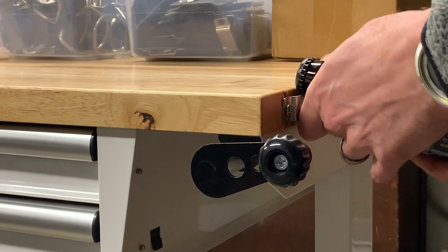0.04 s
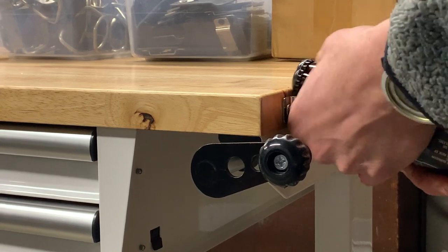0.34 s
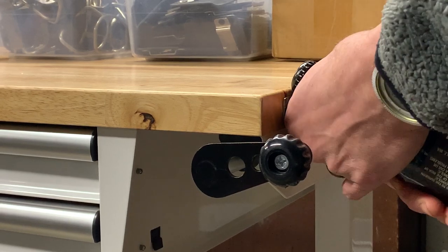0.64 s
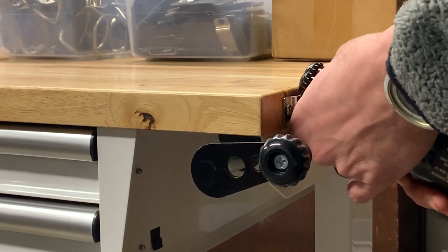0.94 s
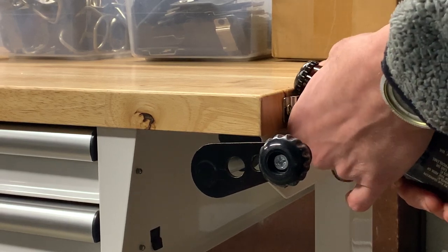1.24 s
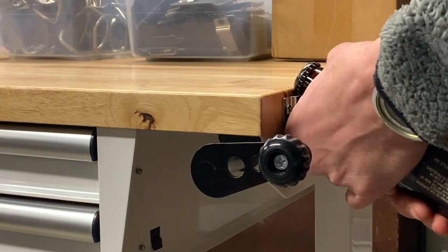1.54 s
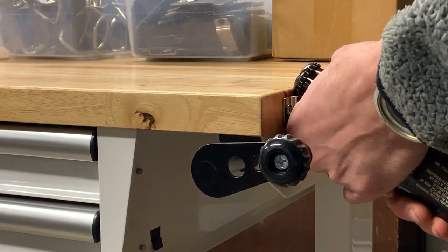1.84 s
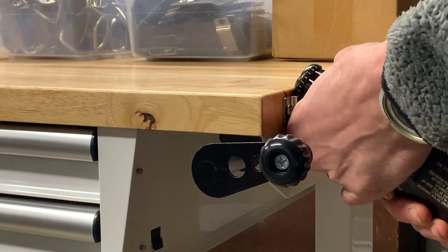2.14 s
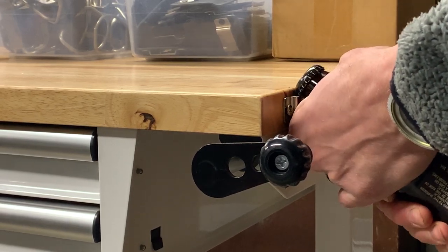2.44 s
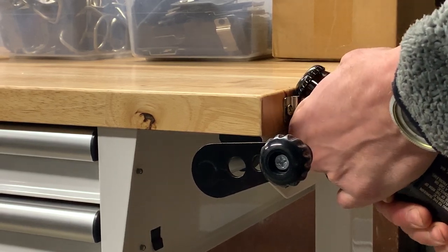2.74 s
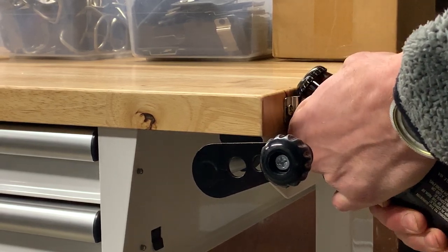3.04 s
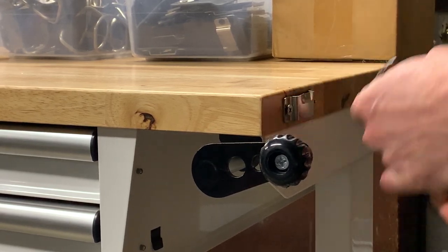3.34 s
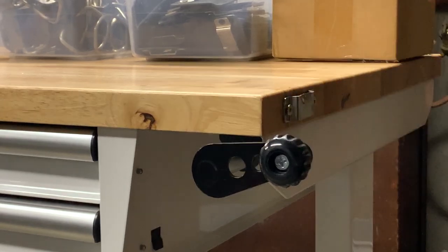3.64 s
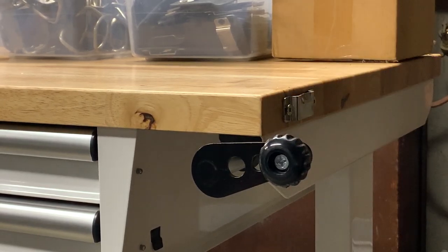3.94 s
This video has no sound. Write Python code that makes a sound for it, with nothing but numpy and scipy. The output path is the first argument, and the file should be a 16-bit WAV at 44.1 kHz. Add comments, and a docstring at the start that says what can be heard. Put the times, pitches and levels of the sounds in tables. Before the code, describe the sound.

A bottle is opened on a metal opener fixed to a wooden workbench. Soft knocks and creaks lead to a spit of gas and a hollow pop, then the cap lands ringing. Heard close in a small workshop.

```python
"""A capped bottle is levered open on a metal opener at the edge of a wooden workbench.
Heard from close by on a stereo pair of microphones, in a small workshop with a low rumble.
Glass and cap knock, creak and rub on the opener; the cap gives way with a spit of gas and a hollow pop
that shakes the bench. The opener rattles faintly, and the cap lands with a bright ring."""
import sys
import numpy as np
from scipy import signal
from scipy.fft import rfft, irfft
from scipy.io import wavfile
from scipy.ndimage import uniform_filter1d

SR = 44100
rng = np.random.default_rng(int(sys.argv[2]) if len(sys.argv) > 2 else 0)


def unload_audio(sound):
    """Save the sound as a 16-bit wav file, at the path given as the first command line argument."""
    columns = np.transpose(np.atleast_2d(sound))
    # keep every value between -1 and 1, then stretch to whole-number steps
    steps = np.round(np.clip(columns, -1, 1) * 32767)
    wavfile.write(sys.argv[1], SR, steps.astype(np.int16))


N = 176400

# the workshop's rumble: (frequency [Hz], level [dB])
RUMBLE_SPECTRUM = [(20, -1), (35, -3), (65, -0.5), (105, -3.5), (160, -16), (300, -17.5), (600, -29),
                   (1200, -41), (2500, -44.5), (7000, -48.5), (10000, -46.5), (11500, -49), (14000, -46.5),
                   (16000, -59)]
# its slow swell: (time [s], level [dB])
RUMBLE_LEVEL = [(0, -68), (.3, -64.5), (.6, -59), (1.5, -56.5), (2.55, -54), (2.8, -57.5), (3.2, -60),
                (4, -55)]
# the room's reverberation: (frequency [Hz], t60 [s])
ROOM_T60 = [(100, 0.38), (300, 0.54), (700, 0.44), (2000, 0.41), (5000, 0.34), (9000, .27), (15000, .22)]
# how alike the room is at the two microphones: (frequency [Hz], coherence [0-1])
MIC_COHERENCE = [(50, 0.96), (130, .88), (300, 0.52), (700, 0.12), (1500, 0.034), (5000, 0.035)]

# friction: (time [s], length [s], level [dB], roughness [0-1])
GLASS_RUBS = [(.02, 0.34, -81, 0.54), (.235, 0.21, -65, 0.62), (.38, 0.086, -60.5, .7),
              (0.739, 0.12, -66, .8), (0.961, .06, -82, 0.6), (1.112, 0.07, -70, 0.4), (1.91, .15, -73, .6),
              (2.845, .13, -77, .6)]  # skin on glass
SLEEVE_RUSTLES = [(1.9, 0.29, -69, .7), (2.259, 0.25, -70, .8), (3.301, 0.34, -58, 0.6)]  # hand and sleeve strain, then draw the bottle away
# the cap's rim ticks on the steel: (time [s], level [dB])
RIM_TICKS = [(.122, -63), (.476, -60), (.883, -47.5), (1.2535, -51), (1.28, -58), (1.665, -59), (1.69, -55),
             (1.708, -60), (1.76, -60), (2.617, -64)]
# the bottle knocks on the opener: (time [s], wooden thud [dB], metal click [dB], thud rise [s])
BOTTLE_KNOCKS = [(.388, -43.5, -48, 0.0063), (.42, -44, -63, 0.016), (.4735, -32.5, -45.5, 0.0023),
                 (0.578, -64, -65, .002), (.746, -49.5, -48.5, .002), (.784, -40, -56, 0.01),
                 (.806, -40.5, -63, 0.0063), (.87, -44, -68, 0.012), (1.161, -56.5, -59.5, 0.002),
                 (1.257, -44, -62, 0.0057), (1.281, -36.5, -47, 0.0024), (1.305, -45, -66, 0.0097),
                 (1.81, -55.5, -85, .02), (1.85, -54.5, -89, 0.01), (1.975, -55, -74, 0.011),
                 (3.402, -47, -51, 0.0034)]
# the neck seats in the opener: (time [s], hollow knock [dB], metal click [dB])
NECK_SEATS = [(.678, -37.5, -50), (2.887, -40.5, -72)]
# the crimp creaks under the lever, in single slips: (time [s], level [dB])
CRIMP_SLIPS = [(1.94, -55), (2.024, -48), (2.12, -58), (2.22, -57), (2.30, -50), (2.35, -58), (2.385, -58),
               (2.436, -54), (2.536, -62), (2.615, -57)]
# the cap lands on its rim and slaps flat: (time [s], crack [dB], rim tick [dB])
CAP_IMPACTS = [(3.617, -7.5, -22), (3.6195, -7.5, -12.5), (3.6216, -15, -27), (3.6269, -21, -14)]

# noise colours of the sources: (frequency [Hz], level [dB])
RUB_SPECTRUM = [(300, -0.5), (1000, -7), (1900, -1.5), (3300, -8), (4500, 4), (5300, 4), (6300, -11),
                (10000, -13), (16000, -24)]  # skin on glass
TICK_SPECTRUM = [(1500, -24.5), (4500, -2), (7000, 0), (10000, -3), (12000, -1), (14500, -2), (17000, -19)]  # small steel contacts
THUD_SPECTRUM = [(60, -6), (150, -7.5), (300, 0), (400, -2), (570, 0.5), (800, -9), (1200, -18),
                 (2000, -22), (5000, -54)]  # wood
CLICK_SPECTRUM = [(400, -6), (1200, 2), (2500, -1.5), (3700, 1), (4550, 4), (5400, -6.5), (6500, -1.5),
                  (9500, -13), (15000, -27)]  # the metal opener
SEAT_SPECTRUM = [(120, -15), (400, -5), (600, -3.5), (780, 1), (1150, -7.5), (1500, -14.5), (2500, -19.5),
                 (4000, -28.5), (8000, -44.5)]  # the hollow bottle
SCRAPE_SPECTRUM = [(500, 4.5), (1500, -11), (2300, 6), (3000, -10), (4400, -13), (7000, -4), (12000, -26),
                   (14500, -14), (16000, -20)]  # crimp along steel
RUSTLE_SPECTRUM = [(120, -4.5), (350, 2), (700, -2), (1200, -9.5), (2500, -14.5), (5000, -25),
                   (12000, -32.5)]  # hand and sleeve
SLIP_SPECTRUM = [(120, -10), (350, 13), (650, 5.5), (1200, -8.5), (2500, -16.5), (5000, -45.5),
                 (15000, -39.5)]  # the creaking crimp
GAS_SPECTRUM = [(1000, -11), (2500, -15), (4800, -4), (6000, -8), (7200, -11), (8500, 0), (9800, -1.5),
                (11500, -14), (13200, -4), (15000, -5), (17000, -25)]  # escaping gas
POP_SPECTRUM = [(50, -12.5), (130, -14), (310, -1), (500, -6), (700, -1), (1100, -7.5), (1600, -8),
                (2700, -13.5), (4500, -22), (6500, -22.5), (12000, -46)]  # the opening neck
CRACK_SPECTRUM = [(60, -13), (150, -8), (330, 3.5), (550, -8), (800, -5), (1100, -10), (1800, -9),
                  (2400, -2), (3400, -4.5), (4400, 4), (5200, 2.5), (6500, -6.5), (8500, -7),
                  (11500, -35.5), (16000, -12.5)]  # the cap's impact
SHIMMER_SPECTRUM = [(700, -8), (1500, -9), (2400, -3.5), (3900, -6), (4400, 1), (5300, 8), (5800, -9),
                    (7200, -17), (8200, -3.5), (11000, -7.5), (14500, -3.5), (17000, -16)]  # the crimped rim's many weak modes

# resonances: (frequency [Hz], level [dB], t60 [s])
BENCH_MODES = [(230.1, -10, .3), (295.5, -8, 0.3), (481.4, -6, .22), (563.3, -4.5, .2), (623, -7, 0.11),
               (719.5, -17.5, .2)]
BOTTLE_MODES = [(204, -0.5, .42), (449, -10.5, 0.32), (576, -10.5, 0.14), (781, -1.5, .11),
                (955, -10.5, 0.055), (1174, -11, 0.092)]
POP_MODES = [(233.5, -13, 0.36), (298, -8.5, .33), (380.6, -11, 0.32), (611.6, 0, 0.36), (695, -5, 0.22),
             (746, 6.5, 0.043), (769, -2, 0.16), (1056, 2.5, 0.052), (1109, -17.5, .2), (1393, -9, .17),
             (1800, -10.5, .13), (2130, -20, .18), (2557, -25, .2)]  # bench and bottle together
CAP_MODES = [(328.7, -3, .08), (2460, -10.5, .13), (3180, -11, 0.16), (3650, -20, .2), (4350, 2, .04),
             (4920, -8, .18), (5100, -8, .15), (5170, -1, 0.11), (5270, -16.5, .4), (5290, -8, .27),
             (5400, -12.5, .28), (6358, -18, .2), (8070, -16, .27), (14500, -1, .04)]

CRIMP_S, GAS_S, POP_S, RATTLE_S, CAP_RING_S = 3.1585, 3.1608, 3.1625, 3.436, 3.620


def amp(db):
    """Decibels to gain."""
    return 10 ** (np.asarray(db) / 20)


def unit_rms(x):
    """Scale to unit power."""
    return x / np.sqrt(np.mean(x ** 2) + 1e-20)


def at_hz(points, hz):
    """Read a table on a log-frequency axis."""
    table_hz, values = np.transpose(points)
    return np.interp(np.log(np.maximum(hz, 1)), np.log(table_hz), values)


def add(out, s, x):
    """Mix x in at s seconds."""
    start = int(s * SR)
    out[start:start + len(x)] += x[:N - start]


def noise(spectrum, size):
    """Noise of a given colour and unit power."""
    gain = amp(at_hz(spectrum, np.arange(size // 2 + 1) * SR / size))
    return unit_rms(irfft(gain * np.exp(2j * np.pi * rng.random(len(gain))), size))


def diffuse(pair):
    """Two unrelated noises become room sound at the microphones: alike in the bass, wide in the treble."""
    size = pair.shape[1]
    alike = np.clip(at_hz(MIC_COHERENCE, np.arange(size // 2 + 1) * SR / size), 0, 1)
    mid, side = rfft(pair) * np.sqrt([(1 + alike) / 2, (1 - alike) / 2])
    return irfft(np.array([mid + side, mid - side]), size)


def room_rumble():
    """Low room tone all round the microphones, slowly swelling and easing."""
    level_db = np.interp(np.arange(N) / SR, *np.transpose(RUMBLE_LEVEL))
    return amp(level_db) * diffuse(np.array([noise(RUMBLE_SPECTRUM, N), noise(RUMBLE_SPECTRUM, N)]))


def rub(spectrum, length_s, rough, size=16000):
    """Friction noise that swells and fades, broken into grains."""
    t = np.arange(size) / SR
    grain = unit_rms(uniform_filter1d(rng.standard_normal(size), size=120))
    swell = np.sqrt(np.abs(np.sin(np.pi * np.minimum(t / length_s, 1))))
    return unit_rms(noise(spectrum, size) * np.exp(rough * grain)) * swell


def burst(spectrum, decay_s, rise_s=.00045, size=24000):
    """One contact or puff: coloured noise that rises fast and dies quickly."""
    t = np.arange(size) / SR
    envelope = np.exp(-t / decay_s) * (1 - np.exp(-t / rise_s))
    x = noise(spectrum, size) * envelope
    return x * np.sqrt(np.sum(envelope ** 2) / np.sum(x ** 2))


def handling(click_decay_s=.008):
    """Bottle and cap knock, creak and scrape on the opener while hand and sleeve rub."""
    out = np.zeros(N)
    for s, thud_db, click_db, rise_s in BOTTLE_KNOCKS:
        add(out, s, amp(thud_db) * burst(THUD_SPECTRUM, decay_s=.016, rise_s=rise_s))
        add(out, s, amp(click_db) * burst(CLICK_SPECTRUM, click_decay_s, rise_s / 2))
    for s, knock_db, click_db in NECK_SEATS:
        add(out, s, amp(knock_db) * burst(SEAT_SPECTRUM, decay_s=.017, rise_s=.0059))
        add(out, s, amp(click_db) * burst(CLICK_SPECTRUM, click_decay_s))
    for s, db in CRIMP_SLIPS:
        add(out, s, amp(db) * burst(SLIP_SPECTRUM, decay_s=.0095, rise_s=.0025))
    for s, length_s, db, rough in GLASS_RUBS:
        add(out, s, amp(db) * rub(RUB_SPECTRUM, length_s, rough))
    for s, length_s, db, rough in SLEEVE_RUSTLES:
        add(out, s, amp(db) * rub(RUSTLE_SPECTRUM, length_s, rough))
    add(out, s=1.66, x=amp(-63.5) * rub(SCRAPE_SPECTRUM, length_s=.082, rough=.51))
    return out


def steel_ticks(decay_s=.003, rattle_count=4, rattle_gap_s=.032):
    """Small steel contacts: the rim on the opener, then the freed opener's even chatter."""
    out = np.zeros(N)
    for s, db in RIM_TICKS:
        add(out, s, amp(db) * burst(TICK_SPECTRUM, decay_s))
    for k in range(rattle_count):
        chatter = burst(CLICK_SPECTRUM, decay_s) + amp(-9) * burst(TICK_SPECTRUM, decay_s)
        add(out, RATTLE_S + k * rattle_gap_s, amp(-53) * chatter)
    return out


def ring(modes, spread_db, detune=.005, size=24000):
    """Struck modes of alternating sign, each with a weaker close partner and a new strength per blow."""
    t, out = np.arange(size) / SR, 0
    for k, (hz, db, t60) in enumerate(modes):
        partner_hz = hz * (1 + detune * rng.standard_normal())
        pair = np.sin(2 * np.pi * hz * t) + .35 * np.sin(2 * np.pi * partner_hz * t)
        strength = (-1) ** k * amp(db + spread_db * rng.standard_normal())
        out = out + strength * np.exp(-np.log(1000) * t / t60) * pair / np.sqrt(2)
    return out


def ringing(swell_s=.013, seat_boost_db=4):
    """What rings on: the bench after knocks, the bottle as it seats, both at the pop, the fallen cap."""
    out = np.zeros(N)
    for s, thud_db, _, _ in BOTTLE_KNOCKS:
        add(out, s, amp(thud_db) * ring(BENCH_MODES, spread_db=2))
    for s, knock_db, _ in NECK_SEATS:
        hollow = ring(BOTTLE_MODES, spread_db=.5)
        swell = 1 - np.exp(-np.arange(len(hollow)) / SR / swell_s)
        add(out, s, amp(knock_db + seat_boost_db) * hollow * swell)
    add(out, POP_S, amp(-22.5) * ring(POP_MODES, spread_db=1))
    add(out, CAP_RING_S, amp(-22.5) * ring(CAP_MODES, spread_db=.5))
    return out


def gas_spit():
    """The crimp lets go and the pressure escapes in a sharp spit with a short fizz."""
    out = np.zeros(N)
    add(out, CRIMP_S, amp(-26.5) * burst(GAS_SPECTRUM, decay_s=.003))
    spit = amp(-10.5) * burst(GAS_SPECTRUM, decay_s=.0021, rise_s=.00015)
    fizz = amp(-33) * burst(GAS_SPECTRUM, decay_s=.028)
    add(out, GAS_S, spit + fizz)
    return out


def neck_pop():
    """The open neck gives one hollow pop just behind the gas."""
    out = np.zeros(N)
    add(out, POP_S, amp(-19) * burst(POP_SPECTRUM, decay_s=.011, rise_s=.0006))
    return out


def cap_landing():
    """The cap hits a hard surface four times within a hundredth of a second and its rim shimmers."""
    out, first_s = np.zeros(N), CAP_IMPACTS[0][0]
    for s, crack_db, tick_db in CAP_IMPACTS:
        add(out, s, amp(crack_db) * burst(CRACK_SPECTRUM, decay_s=.0017, rise_s=.00015))
        add(out, s, amp(tick_db) * burst(TICK_SPECTRUM, decay_s=.002))
    add(out, first_s, amp(-27.5) * burst(THUD_SPECTRUM, decay_s=.011))
    add(out, first_s, amp(-35.5) * burst(SHIMMER_SPECTRUM, decay_s=.014))
    return out


def workshop(size=32768, bands=14, onset_s=.005):
    """The room's response at the microphones: a dense tail in which the treble dies first."""
    t, hz = np.arange(size) / SR, np.arange(size // 2 + 1) * SR / size
    centres_hz = np.geomspace(80, 16000, bands)
    white = rfft(diffuse(rng.standard_normal((2, size))))
    tail = 0
    for centre_hz, share in zip(centres_hz, np.eye(bands)):
        band = irfft(white * at_hz(np.c_[centres_hz, share], hz), size)
        tail = tail + band * np.exp(-np.log(1000) * t / at_hz(ROOM_T60, centre_hz))
    fade_in = np.clip(t / onset_s - .5, 0, 1)
    return unit_rms(tail * fade_in) / np.sqrt(size)


def at_mics(x, room, room_db, lag_s=.00007, pan_db=-1.5):
    """Direct sound plus room; the right microphone hears it lag_s later, and pan_db is left over right."""
    n = np.arange(N)
    delayed = np.interp(n - lag_s * SR, n, x)
    direct = np.array([x * amp(pan_db / 2), delayed * amp(-pan_db / 2)])
    return direct + amp(room_db) * signal.fftconvolve(x[None], room, axes=1)[:, :N]


def scene():
    """The workshop from beside the bench, with bottle, opener and cap near the centre of the pair."""
    room = workshop()
    return (at_mics(handling(), room, room_db=-1)
            + at_mics(steel_ticks(), room, room_db=-11.5)
            + at_mics(gas_spit(), room, room_db=-6.5)
            + at_mics(neck_pop(), room, room_db=1, pan_db=1)
            + at_mics(ringing(), room, room_db=-9.5, lag_s=.00013, pan_db=0)
            + at_mics(cap_landing(), room, room_db=-13, lag_s=.00002, pan_db=-2.5)
            + room_rumble())


def record(dry):
    """Both channels carry the right microphone's top octave, slightly later on the left; the top is cut."""
    shared_above_hz, treble_lag_s, cutoff_hz = 7070, .000214, 16100
    hz = np.arange(N // 2 + 1) * SR / N
    left, right = rfft(dry)
    share = 1 / (1 + (shared_above_hz / (hz + 1)) ** 8)
    late_right = right * np.exp(-2j * np.pi * hz * treble_lag_s)
    left = np.sqrt(1 - share) * left + np.sqrt(share) * late_right
    lowpass = signal.ellip(10, .2, 80, cutoff_hz, fs=SR, output="sos")
    return signal.sosfilt(lowpass, irfft(np.array([left, right]), N))


dry = scene()
out = record(dry)
unload_audio(out)
```